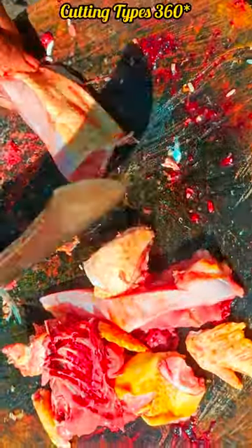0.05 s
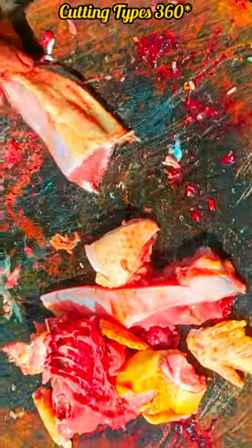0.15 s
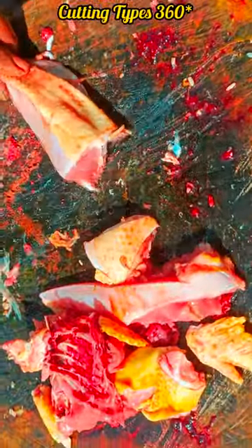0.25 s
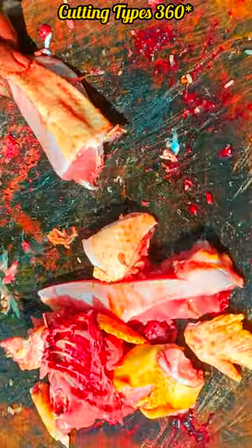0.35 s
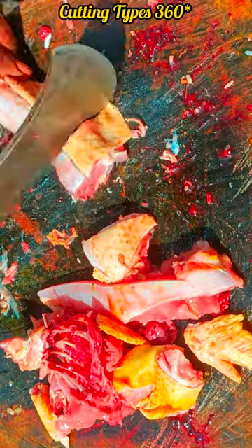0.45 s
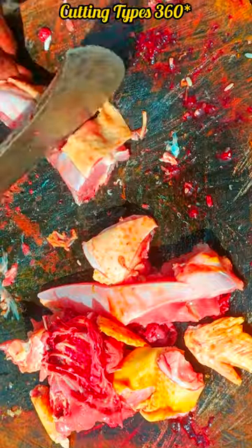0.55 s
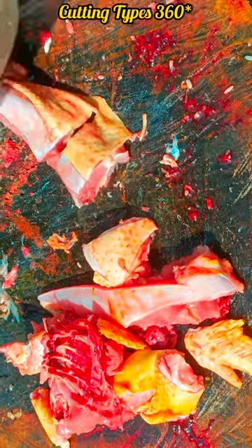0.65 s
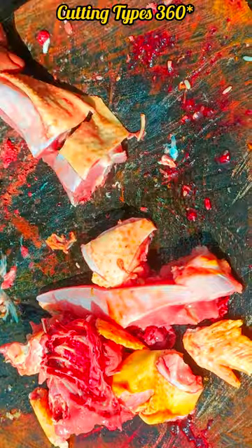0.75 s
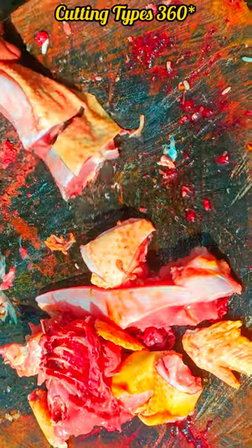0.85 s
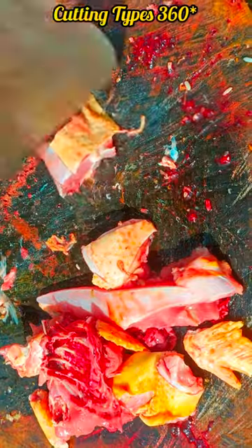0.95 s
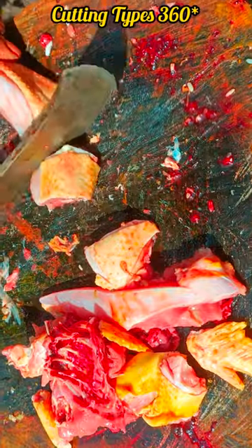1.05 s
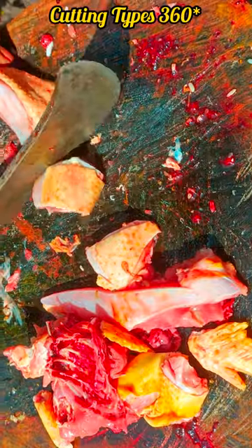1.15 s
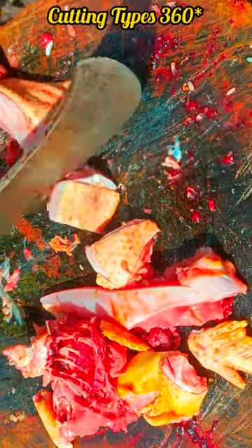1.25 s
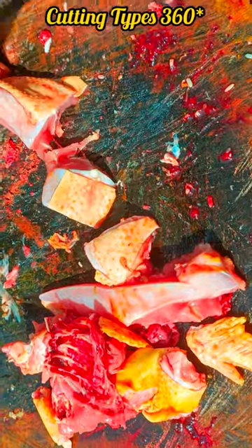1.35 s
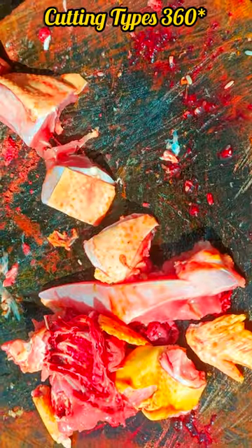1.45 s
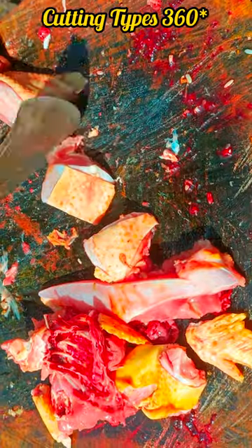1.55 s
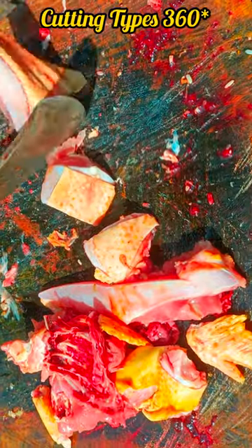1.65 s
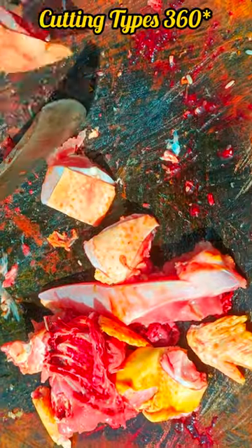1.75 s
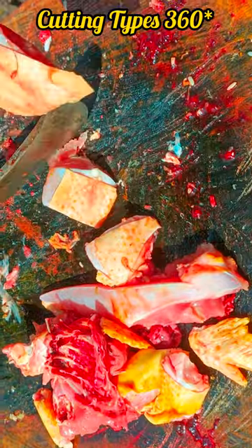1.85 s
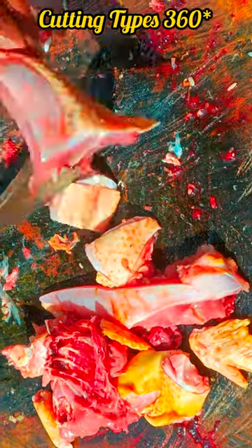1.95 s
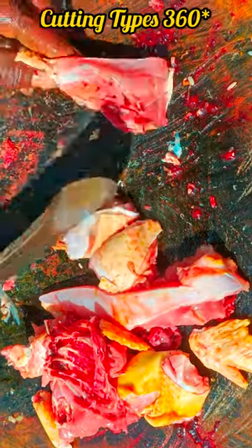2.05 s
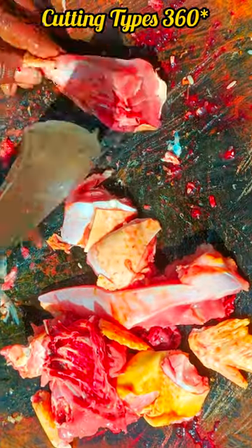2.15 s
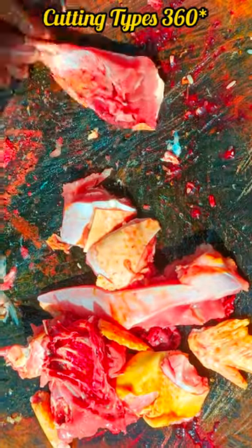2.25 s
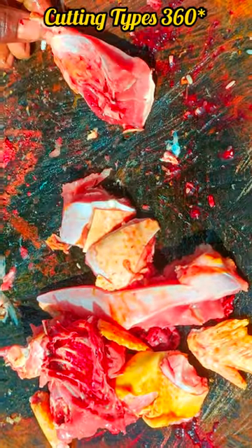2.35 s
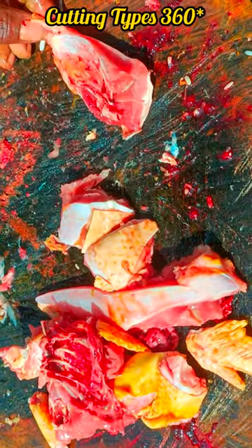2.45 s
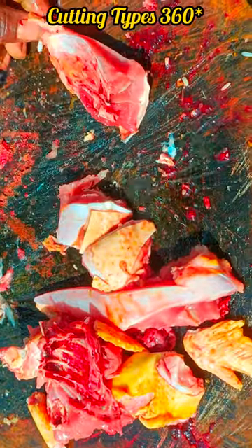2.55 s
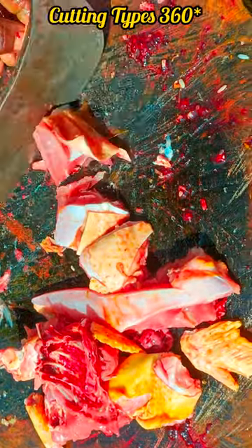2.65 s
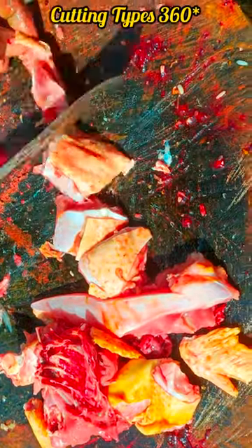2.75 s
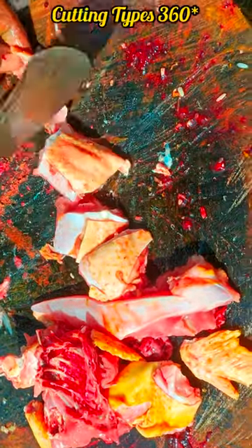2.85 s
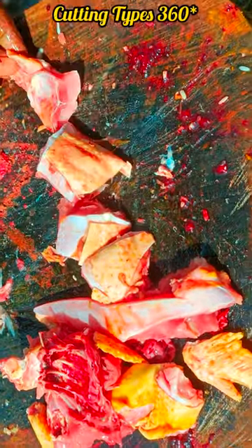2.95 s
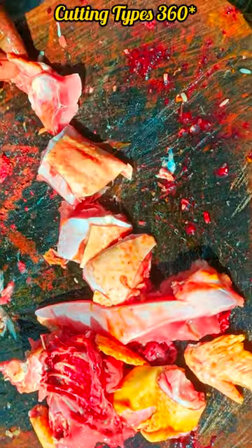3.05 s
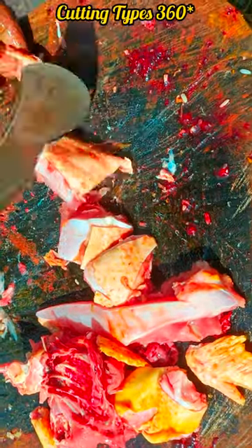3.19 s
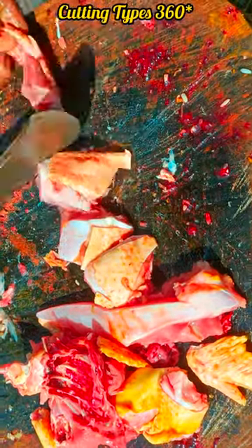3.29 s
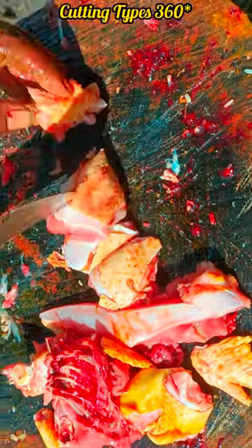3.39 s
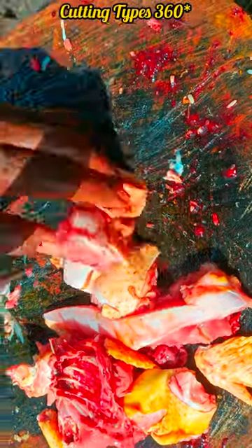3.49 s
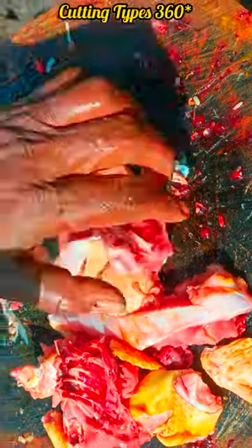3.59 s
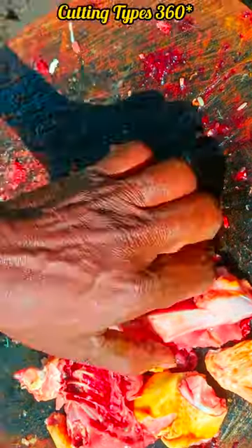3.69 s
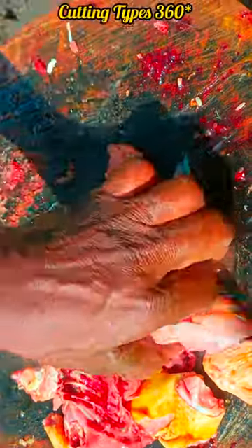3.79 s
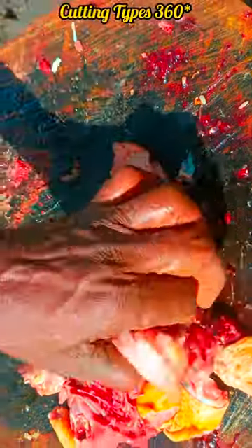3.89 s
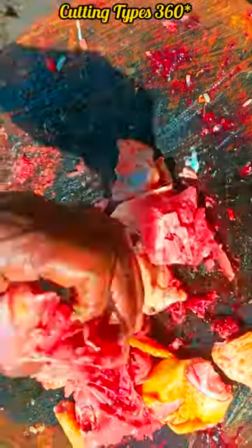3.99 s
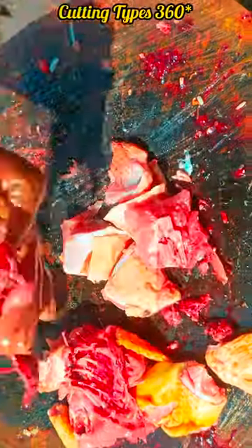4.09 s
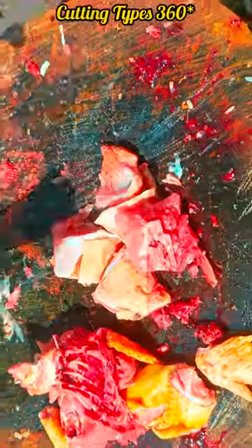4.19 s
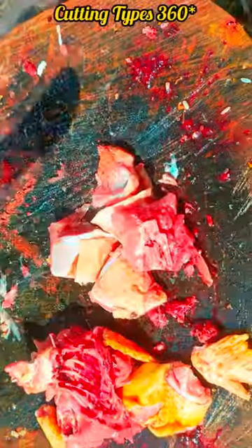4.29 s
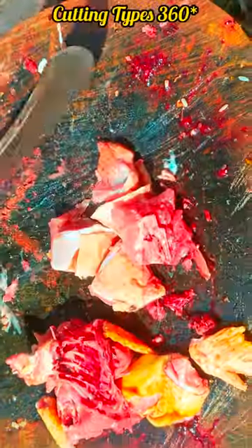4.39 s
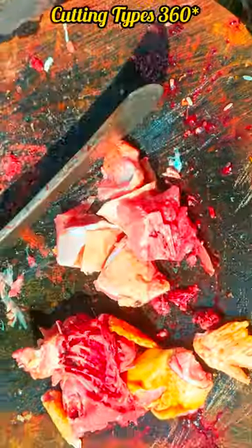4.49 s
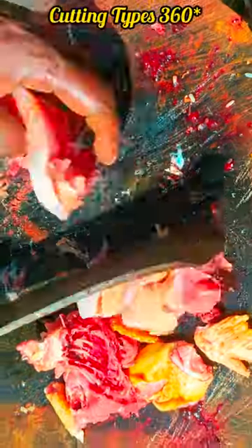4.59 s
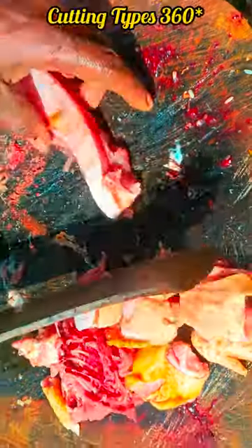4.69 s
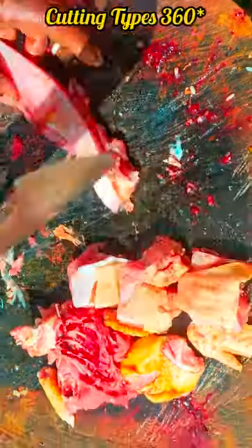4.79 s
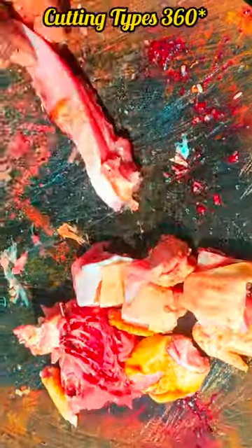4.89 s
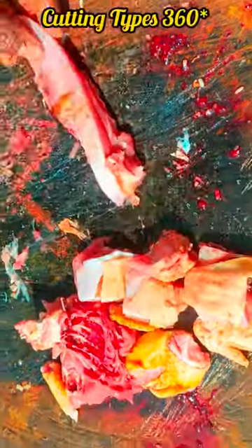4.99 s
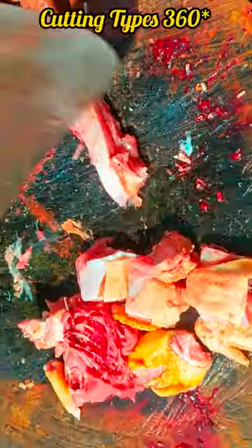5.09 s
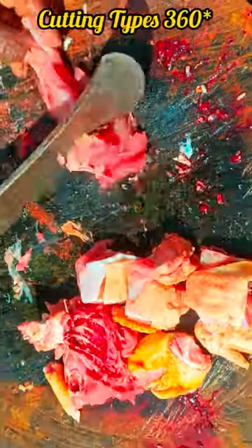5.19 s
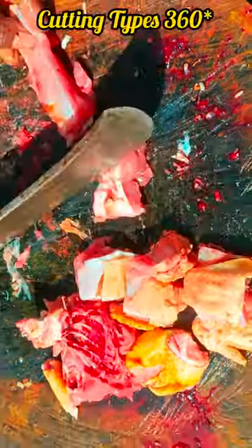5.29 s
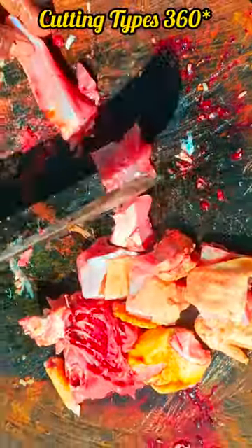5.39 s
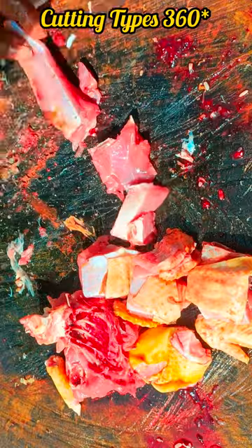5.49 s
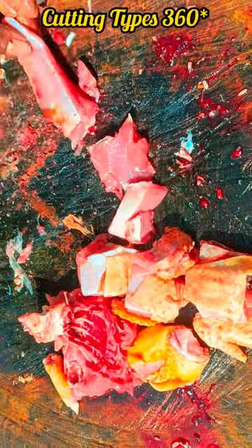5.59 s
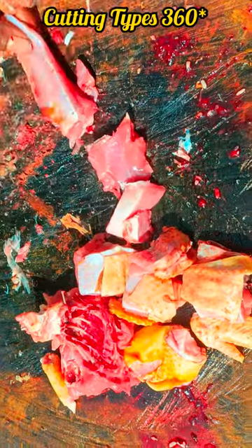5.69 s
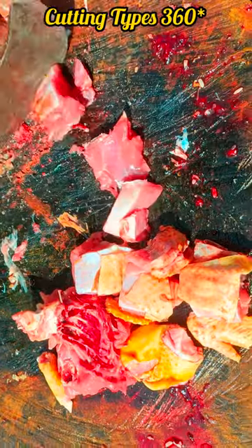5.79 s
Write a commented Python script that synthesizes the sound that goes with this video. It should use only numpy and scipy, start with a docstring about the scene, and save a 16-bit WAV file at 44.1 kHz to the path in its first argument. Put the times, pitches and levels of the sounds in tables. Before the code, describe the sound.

A broad knife chops bone-in chicken on a thick wooden block five times, each strike a sharp crack of bone with a woody thud. In a pause, wet pieces are gathered with faint sliding and ticking, and the knife is put down with a clink. Two more chops follow. The microphone is close, in a small stall, with steady hiss, faint chirps and occasional puffs of air on the left.

```python
"""Over a steady hiss, a broad knife clinks on a thick wooden block, close to a phone in a small stall.
It chops bone-in chicken five times: the bone fractures for a few ms, the edge drives the block's modes,
and hard walls reflect the sound. From the third chop on, air buffets the left microphone port at times.
In a pause the wet pieces are gathered and the knife is laid down; two more chops follow.
Faint chirps and a thin whine come and go in the background."""
import sys
import numpy as np
from scipy import signal
from scipy.fft import rfft, irfft, next_fast_len
from scipy.io import wavfile
from scipy.ndimage import uniform_filter1d, minimum_filter1d

SR = 44100
rng = np.random.default_rng(int(sys.argv[2]) if len(sys.argv) > 2 else 0)


def log_audio(samples):
    """Write samples as a 16-bit WAV file to the path given in sys.argv[1]."""
    # one column per channel
    frames = np.atleast_2d(samples).T
    # limit to full scale, then quantise
    limited = np.clip(frames, -1, 1)
    pcm = np.round(limited * 32767).astype(np.int16)
    wavfile.write(sys.argv[1], SR, pcm)


N = 257544
T = np.arange(N) / SR
RING = T[:SR // 4]  # time axis of one impact
BLOW_LEAD_S = 0.01  # a thud is centred this far into its sound

# Knife chops. Each row: time the edge meets the block in seconds, thud level in dB, block ringing in dB,
# crack level in dB, crack length in seconds, brightness in dB, wood bite in dB, bone pitch in Hz.
CHOPS = [(0.4669, -2.5, -3, 3.5, 0.0041, -3, 4, 3900), (1.026, 0, -0.5, -1.5, .0045, -4, 3.5, 4144),
         (1.632, -0.5, -5, -12, 0.002, -10.5, -1.5, 4200), (2.6501, 2, -1, -3, .0033, -0.5, -1, 5400),
         (3.2547, 1.5, -1.5, -19, .0019, -2, 5.5, 2074), (5.159, -4.5, -1.5, -2.5, 0.003, -2, 6.5, 4050),
         (5.8062, -2, -4, -6.5, 0.0034, 0.5, 0.5, 5250)]
# Strokes of meat or steel over the block. Each row: peak time in seconds, level in dB,
# rise and fall in seconds, left minus right in dB.
SLIDES = [(3.531, -60, 0.027, .04, 1), (3.9, -61.5, .2, 0.17, 3), (4.085, -55, 0.025, 0.02, 0),
          (4.64, -51, 0.1, 0.16, 5), (5.574, -46, 0.0018, 0.029, 10), (5.759, -44.5, 0.0045, 0.062, 14.5)]


def undb(db):
    """Amplitude grows tenfold with every 20 dB."""
    return 10 ** (np.asarray(db) / 20)


def shape(x, gain):
    """Linear filtering: multiply the spectrum of x by gain(frequency)."""
    size = next_fast_len(x.shape[-1] + 4096)
    hz = np.arange(size // 2 + 1) * SR / size
    return irfft(rfft(x, size) * gain(hz), size)[..., :x.shape[-1]]


def colour(x, points, channels=1):
    """Equalisation: filter x by (Hz, dB per channel) points joined over log frequency."""
    hz, *db = np.transpose(points)

    def gain(f):
        return undb(np.squeeze([np.interp(np.log(f + 1), np.log(hz), db[k]) for k in range(channels)]))
    return shape(x, gain)


def edge(x, hz, kind):
    """A second-order low-pass or high-pass slopes by 12 dB per octave."""
    return signal.sosfilt(signal.butter(2, min(hz, SR / 2 - 100), kind, fs=SR, output="sos"), x)


def add(track, s, sound):
    """Superposition: sum a sound into the track from time s."""
    start = min(max(int(round(s * SR)), 0), N)
    track[start:start + len(sound)] += sound[:N - start]


def swell(track, s, half, make):
    """Amplitude modulation: mix in make(t) under a Gaussian envelope centred on time s."""
    t = np.arange(int(5 * half * SR)) / SR - 2.5 * half
    add(track, s + t[0], np.exp(-(t / half) ** 2) * make(t))


def flare(s, rise, fall):
    """Exponential growth to 1 at time s, then exponential decay."""
    return np.exp(-np.minimum(np.maximum((s - T) / rise, (T - s) / fall), 20))


def background(shared_hz=500):
    """Partial coherence: the ports share a gently swaying rumble, but each has its own hiss."""
    # Noise spectrum. Each row: frequency in Hz, left and right gain in dB.
    hiss = [(25.2, -56, -58), (70, -42.5, -45.5), (130, -49.5, -46.5), (273, -54.5, -53),
            (730, -55.5, -53.5), (2100, -61.5, -49.5), (2950, -63.5, -53.5), (4715, -65, -44),
            (5840, -69.5, -55.5), (7600, -70, -75), (7660, -62.5, -85), (11370, -70.5, -90),
            (14000, -74, -75.5), (16000, -79.5, -77)]
    own = shape(rng.standard_normal((2, N)), lambda f: np.sqrt(1 - .9 / (1 + (f / shared_hz) ** 2)))
    sway_db = np.interp(T, np.linspace(0, T[-1], 50), 1.2 * rng.standard_normal(50))
    rumble = shape(rng.standard_normal(N), lambda f: 1 / np.sqrt(1 + (f / shared_hz) ** 2))
    return colour(own + rumble * undb(sway_db), hiss, channels=2)


def crunch(decay_s, spread_db):
    """Ever weaker micro-impacts merge into exponentially decaying noise of unit energy."""
    noise, unevenness = rng.standard_normal((2, len(RING)))
    sizes = undb(spread_db * np.repeat(unevenness, 32)[:len(RING)])
    burst = noise * sizes * np.exp(-RING / decay_s)
    return burst / np.sqrt(np.sum(burst ** 2))


def ring(modes, scatter_db=0):
    """A struck body rings as a sum of damped modes; the place of the blow varies their shares."""
    shares_db = scatter_db * rng.standard_normal(len(modes))
    return sum(undb(db + share - 60 * RING / t60) * np.cos(2 * np.pi * hz * RING)
               for (hz, db, t60), share in zip(modes, shares_db))


def blade(ring_db=-10.5, grit_db=5.5):
    """Rattling contact excites the modes of the loose steel blade, which the wood damps."""
    # Blade contacts. Each row: start in seconds, level in dB.
    clinks = [(.001, -28.5), (.0095, -27.5), (0.024, -32.5), (4.492, -41), (4.5128, -30), (4.529, -27.5),
              (4.546, -41.5)]
    # Blade modes. Each row: frequency in Hz, level in dB, 60 dB decay time in seconds.
    blade_modes = [(970, 1, 0.034), (1304, -20, 0.045), (1762, -13, 0.082), (2665, -14, 0.019),
                   (3420, 4.5, 0.019), (4375, -2.5, 0.032), (4690, -13, 0.039), (6190, -2, 0.021),
                   (7930, -1, .02), (8550, -21, .031), (8900, -9, 0.037), (10440, -0.5, 0.032),
                   (12460, -17, .03)]
    taps = np.zeros(N)
    for s, db in clinks:
        add(taps, s, undb(db) * crunch(decay_s=.0035, spread_db=5))
    ringing = signal.fftconvolve(taps, ring(blade_modes))[:N]
    return undb(ring_db) * ringing + undb(grit_db) * edge(taps, 5000, "low")


def thud(contact_hz, low_hz, dull_hz, ring_db=0):
    """A blow gives a forced push, duller for a softer contact, and free vibration of the block."""
    # Block modes. Each row: frequency in Hz, level in dB, 60 dB decay time in seconds.
    block_modes = [(217.9, -23.5, 0.095), (268.5, -20, 0.054), (320, -24.5, 0.029), (421.4, -26, .06),
                   (563, -16.5, 0.064), (625.3, -29.5, 0.06), (738.5, -29, 0.13), (762, -40.5, 0.095),
                   (828, -42.5, 0.063), (1045, -29.5, .09), (1080, -41, 0.25), (1336, -33.5, 0.047),
                   (1495, -39, 0.12), (1620, -41.5, 0.067), (1845, -30.5, 0.088), (2142, -39.5, 0.13),
                   (2281, -38, .11)]
    blow = np.zeros(len(RING))
    blow[round(BLOW_LEAD_S * SR)] = 1
    push = shape(blow, lambda f: SR / contact_hz * (f / contact_hz) ** 2
                 / (1 + (f / contact_hz) ** 2) ** 2.97)
    body = undb(ring_db) * signal.fftconvolve(blow, ring(block_modes, scatter_db=3.0))[:len(RING)]
    return shape(push + body, lambda f: f ** 3 / (f ** 3 + low_hz ** 3) / (1 + (f / dull_hz) ** 6))


def knocks():
    """Light, soft contacts between the chops excite mainly the block's low modes."""
    # Each row: time in seconds, level in dB, contact frequency in Hz.
    contacts = [(.010, -29.5, 255), (.024, -32.5, 208), (0.5099, -15.5, 215), (4.4594, -10.5, 257),
                (4.514, -30.5, 240), (4.5549, -22.5, 232)]
    out = np.zeros(N)
    for s, db, hz in contacts:
        add(out, s - BLOW_LEAD_S, undb(db) * thud(hz, low_hz=176, dull_hz=6.05 * hz, ring_db=-1.5))
    return out


def fracture(length, spread_db):
    """Fracture is a dense run of uneven micro-breaks: a short noise burst of unit energy."""
    noise, unevenness = rng.standard_normal((2, len(RING)))
    burst = noise * undb(spread_db * unevenness) * np.exp(-(RING / length) ** 4)
    return burst / np.sqrt(np.sum(burst ** 2))


def snaps(gain_db=4):
    """Wet meat and bone chips part abruptly; each snap is louder at the nearer port."""
    # Each row: start in seconds, level in dB, length in seconds, lower edge in Hz, left minus right in dB.
    breaks = [(0.097, -32, 0.0021, 6000, 6), (2.0967, -24.5, 0.0057, 6000, 8),
              (2.133, -24, 0.0092, 1580, 13), (2.7265, -22.5, 0.0023, 5900, 2),
              (3.8176, -24.5, 0.0023, 7040, 8), (3.893, -34, 0.0047, 2490, -3),
              (3.908, -18.5, 0.007, 7077, 12), (4.084, -28, 0.0046, 1000, -7.5), (4.66, -23, .003, 3020, 4),
              (4.6672, -4.5, 0.0071, 2000, 1.5), (4.899, -27, 0.0052, 6030, 6),
              (5.339, -29.5, 0.0054, 5000, 13.5), (5.669, -15.5, 0.00033, 1190, 19)]
    out = np.zeros((2, N))
    for s, db, length, hz, pan_db in breaks:
        snap = undb(db + gain_db) * edge(fracture(length, spread_db=6), hz, "high")
        for track, side in zip(out, (1, -1)):
            add(track, s, undb(side * pan_db / 2) * snap)
    return out


def narrow(t, hz, width_hz):
    """Band-limited noise sounds more pitched the narrower its band; rms near 1."""
    band = shape(rng.standard_normal(len(t)), lambda f: 1 / (1 + (2 * (f - hz) / width_hz) ** 4))
    return np.sqrt(SR / 2 / width_hz) * band


def whistles():
    """Narrow noise bands swell and fade as faint far chirps, high hiss and a thin whine."""
    # Each row: middle in seconds, level in dB, half length in seconds.
    chirps = [(.372, -48, .008), (0.921, -67, 0.018), (3.555, -55.5, .029), (4.593, -57.5, .034)]
    # Each row: middle in seconds, level in dB, half length in seconds, frequency in Hz.
    whines = [(2.2, -68.5, 0.43, 4630), (3.007, -71.5, .25, 4340), (3.92, -66, .25, 4705)]
    # Each row: middle in seconds, level in dB.
    hiss_swells = [(1.309, -68), (2.375, -65.5)]
    out = np.zeros(N)
    for s, db, half in chirps:
        swell(out, s, half, lambda t: undb(db) * narrow(t, hz=4887, width_hz=100))
    for s, db, half, hz in whines:
        swell(out, s, half, lambda t: undb(db) * narrow(t, hz, width_hz=76))
    for s, db in hiss_swells:
        swell(out, s, half=0.18, make=lambda t: undb(db) * narrow(t, hz=5300, width_hz=1300))
    return out


def cracks(bone_db=8, wood_db=8, bite_s=0.0024, crunch_db=-8, lead_in_db=-19, lead_in_s=0.0024,
           pitch_db=6, width_hz=500):
    """Brittle fracture: after a faint short hiss, bone splinters around its pitch, then wood fibres."""
    # Spectra of splintering bone and of bitten wood. Each row: frequency in Hz, gain in dB.
    bone_spectrum = [(400, -23.5), (1000, -9.5), (2200, 4.5), (4000, -2), (6000, 0), (8000, -2),
                     (11000, -4), (16000, -7)]
    wood_spectrum = [(200, -24.5), (600, -6.5), (1100, 5.5), (1900, 5), (2600, -9.5), (4000, -14),
                     (5500, -11), (8000, -27), (16000, -30.5)]
    bone, wood = np.zeros(N), np.zeros(N)
    for s, _, _, crack_db, length, bright_db, bite_db, hz in CHOPS:
        burst = fracture(length, spread_db=4.5) + undb(crunch_db) * crunch(decay_s=.006, spread_db=2.0)
        burst = shape(burst, lambda f: undb(bright_db * np.minimum(f / 5000 - 1, 1)  # spectral tilt
                                            + pitch_db / (1 + ((f - hz) / width_hz) ** 2)))
        add(bone, s - length, undb(crack_db) * burst)
        lead_in = undb(crack_db + lead_in_db) * fracture(lead_in_s, spread_db=1)  # softens the rise
        add(bone, s - length - lead_in_s, lead_in)
        add(wood, s - .001, undb(bite_db) * fracture(bite_s, spread_db=5.5))
    return undb(bone_db) * colour(bone, bone_spectrum) + undb(wood_db) * colour(wood, wood_spectrum)


def block(contact_hz=400, flesh_db=-20, flesh_lead_s=0.0061):
    """A chop's momentum passes through the flesh, then into the wood, which the meat damps unequally."""
    out = np.zeros(N)
    for s, db, ring_db, *_ in CHOPS:
        start = s - BLOW_LEAD_S
        add(out, start, undb(db) * thud(contact_hz, low_hz=85, dull_hz=2700, ring_db=ring_db))
        add(out, start - flesh_lead_s, undb(db + flesh_db) * thud(580, low_hz=130, dull_hz=900))
    return out


def walls(x, dull_hz=2500):
    """Early reflections: near surfaces return delayed, duller copies of the sound."""
    # Each row: delay in seconds, gain in dB.
    echoes = [(.0081, -15.5), (0.0115, -12.5), (0.0174, -24), (0.0223, -12.5), (0.0263, -22.5)]
    out = np.zeros(N)
    for delay, db in echoes:
        add(out, delay, undb(db) * x)
    return shape(out, lambda f: 1 / (1 + (f / dull_hz) ** 2))


def diffuse(x, low_hz, t60=0.14, build_s=0.0033, hold_s=0.0092):
    """Reverberation: dense reflections build up, hold briefly and decay, unlike at each port."""
    envelope = (1 - np.exp(-(RING / build_s) ** 2)) * undb(-60 * np.maximum(RING - hold_s, 0) / t60)
    tails = rng.standard_normal((2, len(RING))) * envelope
    tails /= np.sqrt(np.sum(tails ** 2, axis=1, keepdims=True))
    return edge(signal.fftconvolve(np.atleast_2d(x), tails, axes=1)[:, :N], low_hz, "high")


def buffets(low_hz=89, high_hz=150, churn_db=-11, churn_hz=320, eddy_hz=127, leak_db=-29):
    """Turbulent pressure rumbles at the left port; a strong eddy swings its diaphragm once."""
    # Each row: peak time in seconds, level in dB, rise and fall in seconds.
    gusts = [(1.625, -24.5, 0.045, .042), (2.095, -37.5, .025, 0.038), (3.71, -41.5, .035, 0.039),
             (4.311, -49, 0.022, 0.027), (4.854, -42.5, 0.014, 0.0098), (5.361, -31, 0.025, 0.072),
             (5.668, -38.5, 0.01, 0.0089)]
    # Each row: time in seconds, level in dB.
    eddies = [(1.581, -16.5), (1.614, -15.5), (1.69, -15), (1.928, -31), (3.72, -18.5), (5.365, -13),
              (5.424, -15.5)]
    strength = sum(undb(db) * flare(s, rise, fall) for s, db, rise, fall in gusts)
    rumble = shape(rng.standard_normal(N),
                   lambda f: f ** 4 / (f ** 4 + low_hz ** 4) / (1 + (f / high_hz) ** 6))
    churn = shape(rng.standard_normal(N), lambda f: 1 / (1 + (f / churn_hz) ** 8))
    left = strength * (rumble / rumble.std() + undb(churn_db) * churn / churn.std())
    for s, db in eddies:
        swell(left, s, half=0.0041, make=lambda t: -undb(db) * np.sin(2 * np.pi * eddy_hz * t))
    return np.array([left, undb(leak_db) * left])


def sliding(gain_db=1, grain_db=3.0, low_hz=1600):
    """Friction on the block makes grainy noise that rises and falls with each stroke."""
    out = np.zeros((2, N))
    grains = undb(grain_db * np.repeat(rng.standard_normal(N // 32 + 1), 32)[:N])
    for track, side in zip(out, (1, -1)):
        strength = sum(undb(db + gain_db + side * pan_db / 2) * flare(s, rise, fall)
                       for s, db, rise, fall, pan_db in SLIDES)
        track += edge(strength * grains * rng.standard_normal(N), low_hz, "high")
    return out


def ticks(count=10, scatter_s=0.15, level_db=-33, spread_db=3, low_hz=3800, pan_db=9):
    """Adhesion gives way: sticky meat ticks faintly at random times around the sliding strokes."""
    out = np.zeros(N)
    for k, (offset, size) in enumerate(rng.standard_normal((count, 2))):
        stroke_s = SLIDES[k % len(SLIDES)][0]
        tick = undb(level_db + spread_db * size) * fracture(length=0.0037, spread_db=6)
        add(out, stroke_s + scatter_s * offset, tick)
    return undb(np.array([[1], [-1]]) * pan_db / 2) * edge(out, low_hz, "high")


def scene(thud_wet_db=-8, crack_wet_db=-6.0, small_wet_db=-14):
    """Direct and reflected sound superpose at two unlike ports, the left a little nearer the block."""
    # Port responses. Each row: frequency in Hz, left and right gain in dB.
    ports = [(100, 3, 5.5), (300, 6, 8), (750, 1, 4), (1310, -2.5, 3), (2580, -2.5, 6.5), (4080, -1, 14.5),
             (5630, -11, 10.5), (6900, -6, 0.5), (7840, 5, -16), (9800, 0, -14.5), (12200, 1.5, -8.5),
             (14000, -2.5, 0.5), (16000, -2.5, -0.5)]
    # Colour of the handled pieces. Each row: frequency in Hz, gain in dB.
    handling_spectrum = [(500, 0), (1500, 5.5), (3600, 3.5), (6000, -2), (9000, -8), (16000, -10.5)]
    thuds, bones = block(), cracks()
    handling = colour(snaps() + sliding() + ticks(), handling_spectrum)
    small = handling + blade() + knocks()
    into_room = undb(thud_wet_db) * thuds + undb(crack_wet_db) * bones + undb(small_wet_db) * small
    tail = diffuse(into_room, low_hz=453)
    sound = thuds + bones + small + walls(thuds + bones) + tail + whistles()
    sound[1] = np.r_[np.zeros(3), sound[1, :-3]]  # reaches the right port 3 samples later
    return colour(sound, ports, channels=2) + buffets() + background()


def record(dry, ceiling=1.0, low_hz=20, top_hz=15900):
    """Peak and band limiting: the phone turns down the loudest peaks and cuts deep bass and the top."""
    needed_gain = ceiling / np.maximum(np.abs(dry), ceiling)
    held_gain = minimum_filter1d(needed_gain, size=221, axis=1)  # 5 ms
    limited = dry * uniform_filter1d(held_gain, size=221, axis=1)
    top_cut = signal.ellip(8, .2, 70, top_hz, fs=SR, output="sos")
    return signal.sosfilt(top_cut, edge(limited, low_hz, "high"))


dry = scene()
out = record(dry)
log_audio(out)
```